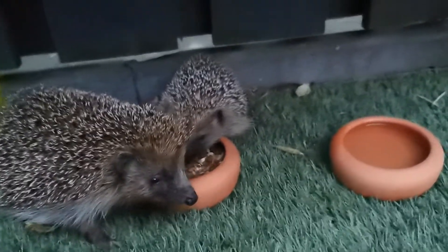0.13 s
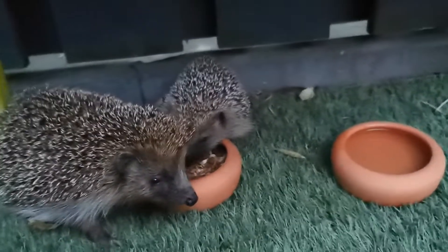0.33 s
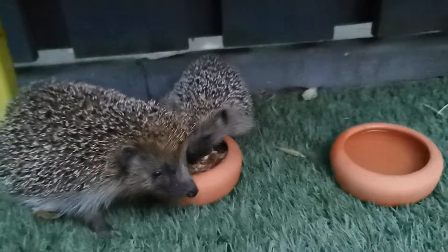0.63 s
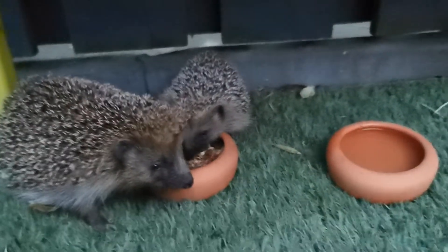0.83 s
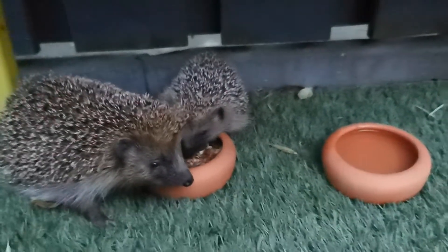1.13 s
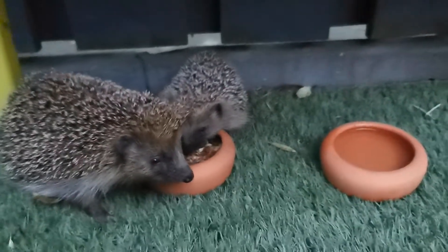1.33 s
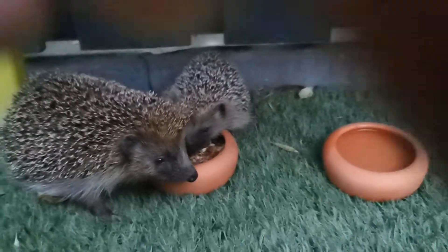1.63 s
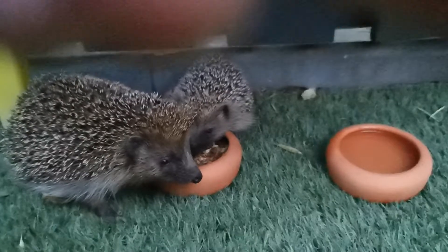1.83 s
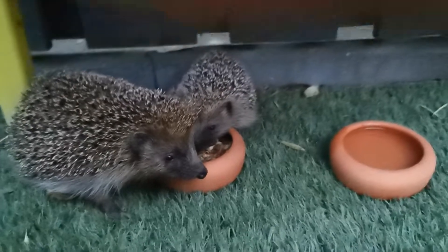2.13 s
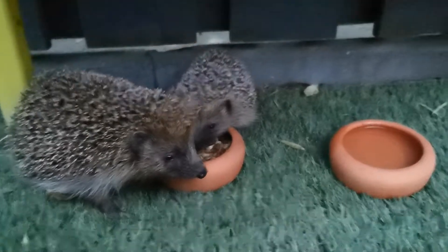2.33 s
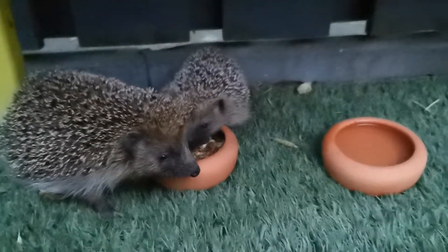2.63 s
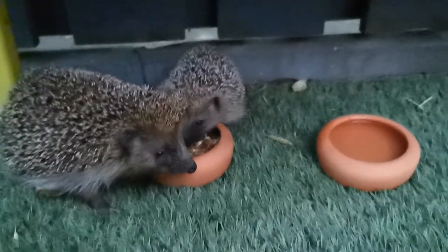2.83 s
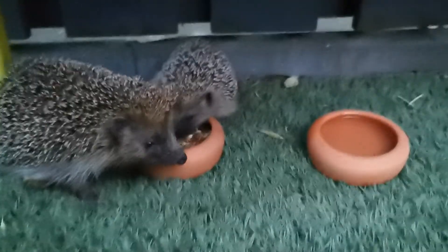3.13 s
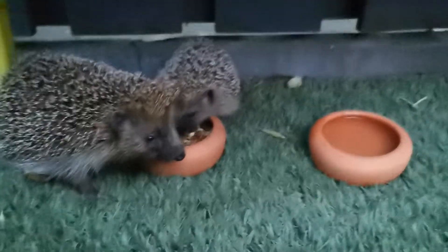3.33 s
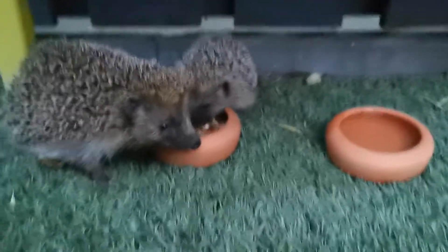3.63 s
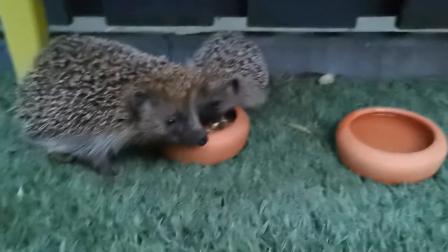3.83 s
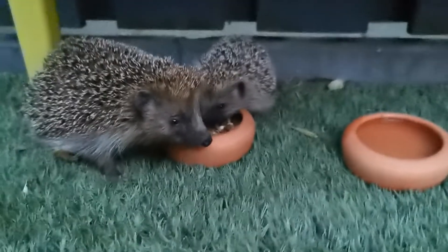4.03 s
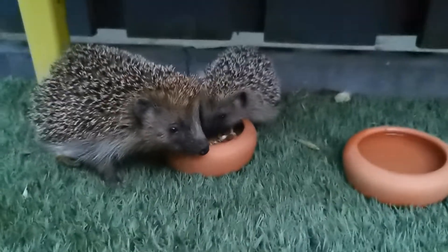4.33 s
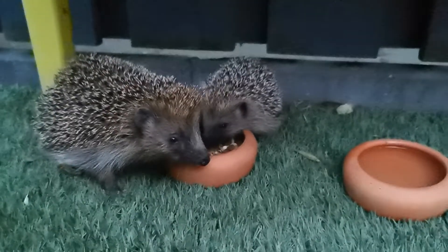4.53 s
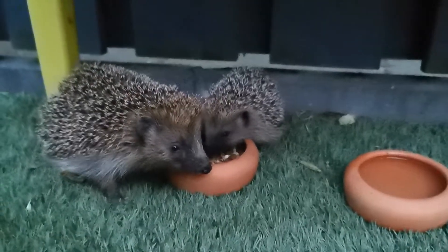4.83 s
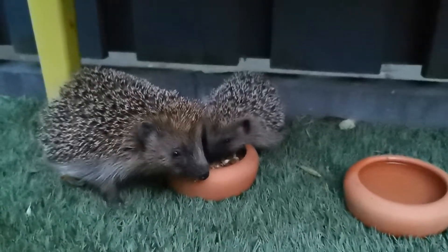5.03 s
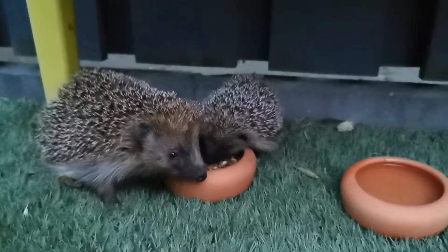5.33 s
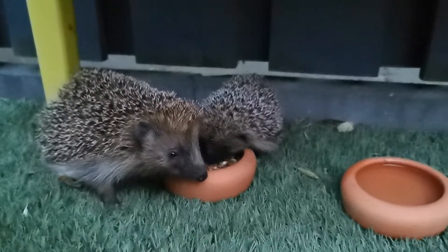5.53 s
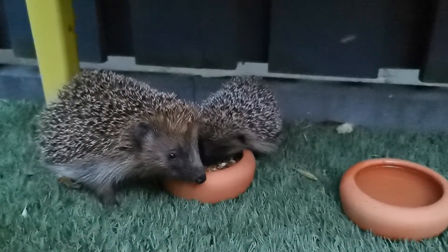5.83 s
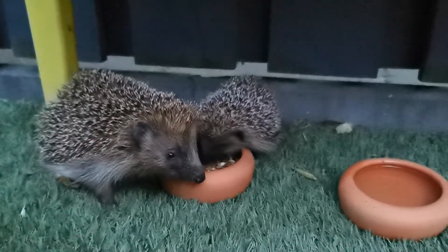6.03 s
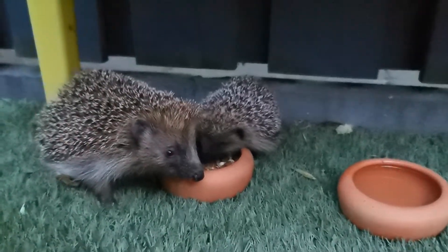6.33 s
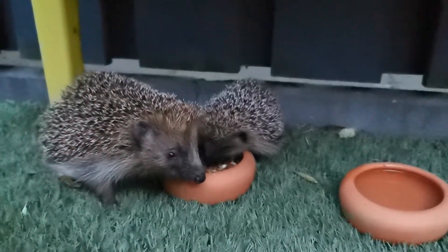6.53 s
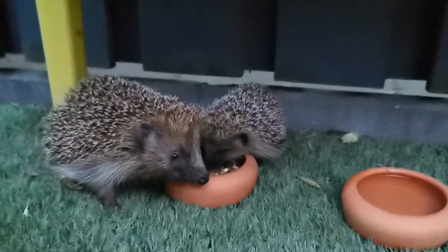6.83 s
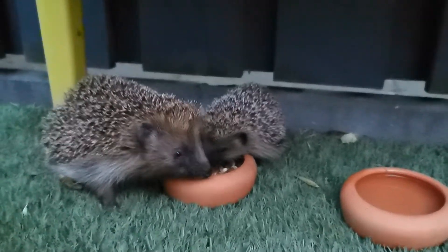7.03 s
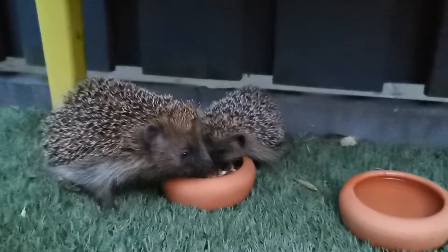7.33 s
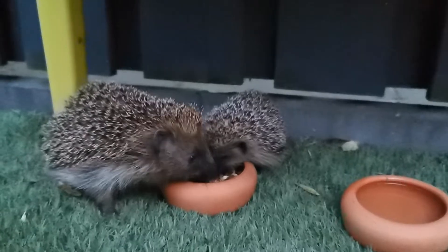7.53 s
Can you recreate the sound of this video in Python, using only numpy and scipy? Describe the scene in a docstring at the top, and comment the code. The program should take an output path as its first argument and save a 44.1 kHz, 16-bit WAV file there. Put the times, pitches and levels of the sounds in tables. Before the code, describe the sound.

A close, quiet garden scene with two hedgehogs eating dry pellets from a clay bowl. A sharp crack opens at 0 s, followed by soft chewing and a faint low swish. From 0.6 to 1.3 s brittle, high snaps come in quick irregular clusters with rustling and tiny splinters, then two more near 1.6 s, one with a dull bowl knock. Faint brushing follows. From 2.3 s a finger rubs the right microphone; between 2.5 and 3 s there are heavy thumps, rumble, crackling slips and a very loud scrape-like pop at 2.7 s. Airy swipes of skin taper until about 4.3 s, with a small case tick at 4.5 s. A faint low hum rises around 4.6 s. Crunching resumes, with strong snaps at 5.2 and 5.5 s, then lighter scattered cracks, rustles and soft low bumps to 7.6 s, over low outdoor murmur and thin hiss.

```python
"""Hedgehogs crunching dry food

Two hedgehogs crack pellets at a clay bowl on a lawn: noise bursts excite ringing snaps, bodies and splinters.
Soft chewing, rustling, swishes and smacks in between are grainy coloured noise; bowl knocks are damped sines. A
finger rubs and slips at the right microphone port of a phone, and the hand bumps the case: shaped noise,
spikes, pressure swings. Behind are a low garden murmur, wavering hums, a swelling low hum that rises in pitch,
and thin hiss."""
import sys
import numpy as np
from scipy import signal
from scipy.fft import rfft, irfft, next_fast_len
from scipy.io import wavfile
from scipy.ndimage import uniform_filter1d

SR = 44100
rng = np.random.default_rng(int(sys.argv[2]) if len(sys.argv) > 2 else 0)


def persist_wave(psi):
    """Save psi, clipped to +-1, as 16-bit WAV."""
    counts = np.round(np.clip(psi, -1, 1) * 32767).astype(np.int16)
    wavfile.write(sys.argv[1], SR, np.atleast_2d(counts).T)


N = 339129
TIME = np.arange(N) / SR

# pellet cracks: start_s, nominal_peak_db, snap_hz, body_re_snap_db, splinters_re_snap_db
CRACK_EVENTS = [(0.0054, -27.5, 5480, -13, -17), (0.57, -47.5, 4970, -9, -23.5),
                (0.606, -37, 5130, -24, -21), (0.615, -35, 5300, -27, -19), (0.624, -37, 5100, -30, -12),
                (0.6491, -31, 5360, -25, -10.5), (0.6739, -29.5, 5130, -16, -16),
                (0.703, -35, 4800, -27, -25), (0.8934, -37, 4870, -8.5, -27.5),
                (0.9305, -27, 5200, -8, -14), (0.954, -32.5, 5470, -11, -9), (0.9819, -24, 4940, -20, -21),
                (1.013, -40, 4660, -5, -13), (1.1557, -43, 4960, -27, -24),
                (1.165, -37.5, 4970, -29, -24.5), (1.2201, -24.5, 5120, -10.5, -11.5),
                (1.227, -38.5, 5430, -6, -15.5), (1.262, -40.5, 4730, -5.5, -5),
                (1.2696, -32, 5400, -5, -8), (1.5892, -32.5, 5080, -13, -14.5),
                (1.6282, -30.5, 5180, -8, -5), (5.0185, -54, 5460, -8, -12), (5.0678, -55.5, 5900, 0, 1),
                (5.189, -27, 5770, -3.5, -3.5), (5.4342, -47, 5800, -7, -9),
                (5.44, -43.5, 5810, -12.5, -13), (5.526, -26, 5350, -4, -11.5),
                (5.971, -37, 5370, -13, -10), (6.1806, -40, 5350, -5.5, -23), (6.2196, -30, 5770, -6.5, -6),
                (6.251, -35.5, 5600, -13, -8), (6.257, -35.5, 5240, -10.5, -8),
                (6.5241, -43.5, 5600, -4, -15), (6.548, -48, 5800, -8, 2.5), (6.558, -41.5, 5150, -11, -17),
                (6.577, -46.5, 5840, -5, -7), (6.778, -40, 5500, -11, -12), (6.841, -46.5, 4970, -2, -2),
                (6.934, -58, 5900, -1, 12.5), (7.242, -40, 5900, -16, -8), (7.2516, -44.5, 6140, -9, -13.5),
                (7.35, -49, 6000, -0.5, -4), (7.526, -53, 5750, 1, 0)]
# finger pressure on the right port, as the level of its rumble: time_s, level_db
FINGER_PRESSURE = [(2.3, -68.5), (2.53, -54), (2.62, -50), (2.74, -49), (2.8, -45.5), (2.92, -50.5),
                   (2.985, -40.5), (3.03, -57.5), (3.22, -58), (3.38, -77), (3.82, -72), (4.39, -71)]
# scraping colour of fingertip and case: freq_hz, gain_db
SCRAPE_COLOUR = [(100, 3.5), (600, -16.5), (2300, 1.5), (3500, -4.5), (6000, -10), (8500, -19), (11000, -2),
                 (13500, -19)]
# finger covers the port up to the first time, then rolls off it until the second
ROLL_START_S, ROLL_END_S = 2.61, 2.95


def from_db(db):
    """Decibels to gain."""
    return 10 ** (np.asarray(db) / 20)


def rms_one(x):
    """Scale to rms 1."""
    return x / np.sqrt(np.mean(x ** 2) + 1e-20)


def in_time(rows):
    """Interpolate each column of a (time, values...) table at every sample."""
    times_s, *columns = np.transpose(rows)
    return [np.interp(TIME, times_s, column) for column in columns]


def during(start_s, end_s):
    """1 inside a stretch of time, with 50 ms fades."""
    corners_s = [start_s - .03, start_s + .02, end_s - .02, end_s + .03]
    return np.interp(TIME, corners_s, [0, 1, 1, 0])


def swell(start_s, length_s, attack_s, release_s):
    """Linear rise, hold to the end of the length, exponential decay."""
    since_s = TIME - start_s
    decay = np.exp(-np.clip((since_s - length_s) / release_s, 0, 30))
    return np.clip(since_s / attack_s, 0, 1) * decay


def together(gains):
    """Unrelated noises add in power."""
    return np.sqrt(sum(gain ** 2 for gain in gains))


def pan(left_re_right_db):
    """Left and right gains with a mean of 1."""
    gains = from_db([[left_re_right_db / 2], [-left_re_right_db / 2]])
    return gains / gains.mean()


def add(out, start_s, sound):
    """Mix a short sound in at its start time."""
    start = max(round(start_s * SR), 0)
    out[:, start:start + sound.shape[-1]] += sound[..., :max(N - start, 0)]


def colour(x, spectrum):
    """Causal minimum-phase filter with the given (Hz, dB) spectrum, built from its cepstrum."""
    size = 2 * next_fast_len(x.shape[-1] // 2 + 512)
    hz, db = np.transpose(spectrum)
    bins_hz = np.fft.rfftfreq(size, 1 / SR)
    log_gain = np.log(from_db(np.interp(np.log(bins_hz + 1), np.log(hz), db)))
    cepstrum = irfft(log_gain)[:size // 2]
    cepstrum[1:] *= 2   # fold onto positive time
    return irfft(rfft(x, size) * np.exp(rfft(cepstrum, size)))[..., :x.shape[-1]]


def resonance(x, hz, width_hz):
    """Two-pole band-pass with peak gain 1."""
    r = np.exp(-np.pi * width_hz / SR)
    zeros = np.array([1, 0, -1]) * (1 - r * r) / 2
    poles = [1, -2 * r * np.cos(2 * np.pi * hz / SR), r * r]
    return signal.lfilter(zeros, poles, x)


def drift(rate_hz):
    """Random knots of spread 1, joined by straight lines."""
    knots = rng.standard_normal(int(N / SR * rate_hz) + 2)
    return np.interp(TIME * rate_hz, np.arange(len(knots)), knots)


def noise(spectrum, alike, grain_db=0., grain_rate_hz=300):
    """Coloured stereo noise of rms 1; alike is the power shared by both sides, grains clump it."""
    shared = np.sqrt(alike) * rng.standard_normal(N)
    white = shared + np.sqrt(1 - alike) * rng.standard_normal((2, N))
    grains = from_db(grain_db * drift(grain_rate_hz))
    grains /= np.sqrt(uniform_filter1d(grains ** 2, size=2200))   # even level over 50 ms
    return rms_one(colour(white * grains, spectrum))


def crunching():
    """Each crack excites a ringing snap, a duller body and a brief spray of splinters."""
    # jaw and pellet, for a 5650 Hz snap: freq_hz, gain_db
    body_colour = [(200, -45), (550, -5.5), (1450, -3), (1950, -1), (2550, 6), (3150, -4), (3600, 1.5),
                   (4050, -4.5), (4700, -1), (8000, -19.5)]
    # splinters: freq_hz, gain_db
    splinter_colour = [(4000, -38), (6800, 13), (7800, 19), (10600, 27), (13000, 23), (15200, 25)]
    # hollow of the bowl, common to all snaps: freq_hz, gain_db
    hollow_colour = [(3900, -12), (4650, 4), (4880, 4), (5080, 6), (5300, 2.5), (5600, 7), (5850, 4.5),
                     (6350, -6.5), (6900, 6), (8000, -7)]
    crest_db = 19.5        # nominal peak above mean level
    snap_pan_db = -2       # snaps lie further right than the other feeding
    right_delay_s = 3.5e-5   # right port is slightly farther away
    out = np.zeros((2, N))
    for start_s, peak_db, hz, body_db, splinter_db in list(CRACK_EVENTS) + crumbs():
        run_s = 0.002 * from_db(0.07 * (peak_db + 45.0))   # harder bites crack for longer
        crack = fracture(run_s, echo_db=4.0, echo_s=0.0017, fence_db=-7.5, fence_s=0.008)
        ringing = resonance(resonance(crack, hz, 900), hz, 1800)
        snap = rms_one(colour(ringing, hollow_colour)) * pan(feeding_side(start_s) + snap_pan_db)
        body_modes = np.array(body_colour) * [hz / 5650, 1]   # a small pellet rings higher all over
        body = rms_one(colour(crack, body_modes)) * from_db(body_db) * pan(-3.3)
        spray = colour(crack * np.exp(-TIME[:crack.shape[1]] / 0.024), splinter_colour)
        splinters = rms_one(spray) * from_db(splinter_db) * pan(-11.0)
        add(out, start_s, from_db(peak_db - crest_db) * (snap + body + splinters))
    left, right = out
    return np.array([left, np.interp(TIME - right_delay_s, TIME, right)])


def crumbs():
    """Three tiny cracks trail each bite at random delays and borrow its colour."""
    delay_scale_s, re_bite_db, top_db = .018, -12.5, -54
    chance = rng.random((len(CRACK_EVENTS), 3, 2))
    rows = []
    for (start_s, peak_db, *colouring), pieces in zip(CRACK_EVENTS, chance):
        for late, weak in pieces:
            delay_s = -delay_scale_s * np.log(1 - late * .95)
            crumb_db = min(peak_db + re_bite_db, top_db) - 6 * weak
            rows.append((start_s + delay_s, crumb_db, *colouring))
    return rows


def fracture(run_s, echo_db, echo_s, fence_db, fence_s):
    """A crack runs in tiny random steps; bowl and fence scatter it, differently to each side."""
    t = TIME[:4096]
    steps = rng.standard_normal(len(t)) * from_db(rng.normal(0, 5, len(t)))
    steps *= np.exp(-(t / run_s) ** 4)
    bowl, fence = rng.standard_normal((2, 2, len(t))) * (1 - np.exp(-t / run_s))
    bowl = from_db(echo_db) * rms_one(bowl * np.exp(-t / echo_s))
    fence = from_db(fence_db) * rms_one(fence * np.exp(-t / fence_s))
    return rms_one(steps) + bowl + fence


def feeding_side(time_s):
    """L-R dB of the feeding: it moves inward as the hand shifts its grip."""
    early_db, late_db = -10, -4.5
    return np.interp(time_s, [FINGER_PRESSURE[0][0], FINGER_PRESSURE[-1][0]], [early_db, late_db])


def knocks():
    """Pellets knock the clay bowl; it rests on grass, so its ring dies within milliseconds."""
    # knocks: start_s, ring_hz, level_db
    bowl_hits = [(1.6299, 1640, -35), (5.191, 1330, -35.5), (5.1916, 2506, -32)]
    ring_decay_s = 0.0012
    out = np.zeros((2, N))
    t = TIME[:1024]
    for start_s, hz, db in bowl_hits:
        ring = np.sin(2 * np.pi * hz * t) * np.exp(-t / ring_decay_s)
        add(out, start_s, from_db(db) * ring * pan(-2))
    return out


def feeding():
    """Soft chewing and grainy rustle of spines, grass and pellets swell with bites and snout pushes."""
    # chewing level, before the munching swing: time_s, level_db
    chewing_level = [(0.02, -58.5), (0.25, -68.5), (0.65, -59.5), (1.1, -66), (1.42, -67.5), (2.2, -69.5),
                     (4.6, -75), (7.66, -75.5)]
    # snout among the pellets: start_s, length_s, rustle_db, chew_re_rustle_db, hiss_re_rustle_db
    rootings = [(0.47, 0.89, -69, -14, -6), (0.862, 0.28, -55, -5, -5.5), (1.136, 0.14, -58.5, -9, -3),
                (2.094, 0.095, -71, 6, 3.5), (2.53, 0.084, -57, -16.5, -13), (4.484, 0.19, -82, -4, 12),
                (4.77, 0.36, -75, -16.5, -5.5), (5.546, 0.27, -71.5, -4, -9), (5.894, 0.058, -69, -7, -3),
                (6.126, 0.21, -67, -6.5, -4), (6.503, 0.064, -64, -6, -11), (7.022, 0.12, -71.5, -21, -0.5),
                (7.192, 0.12, -66, -3, 1.5), (7.32, 0.058, -69, -7, -3), (7.48, 0.16, -79.5, 7, 7)]
    # colours of chewing, rustle and fine hiss: freq_hz, gain_db
    chew_colour = [(450, -0.5), (1450, -4.5), (1700, -0.5), (2200, 8), (3200, -7), (5500, -15), (9000, -52)]
    rustle_colour = [(2000, -22), (3400, -0.5), (4200, 4.5), (5400, 9.5), (6200, -3), (7000, -29),
                     (8500, -26)]
    hiss_colour = [(4000, -25), (6500, -2), (8000, -14.5), (10900, -9), (13200, -13), (16000, -22)]
    root_attack_s, root_release_s = 0.03, 0.025
    munch_spread_db, munch_rate_hz = 3.5, 14
    # constant stirring: level at the loudest chewing, share of the chewing's level curve followed
    stir_db, stir_follows, still_hiss_db = -66.5, 0.69, -74.5
    # grinding, re the crack's peak
    grind_chew_db, grind_rustle_db, grind_hiss_db = -39, -48, -39

    chew_db, = in_time(chewing_level)
    grind = grinding()
    munch_db = munch_spread_db * drift(munch_rate_hz)
    stir = from_db(stir_db + stir_follows * (chew_db - chew_db.max()) + munch_db)
    chew_gains = [from_db(chew_db + munch_db), grind * from_db(grind_chew_db)]
    rustle_gains = [stir, grind * from_db(grind_rustle_db)]
    hiss_gains = [from_db(still_hiss_db), grind * from_db(grind_hiss_db)]
    for start_s, length_s, rustle_db, chew_re_db, hiss_re_db in rootings:
        push = from_db(rustle_db) * swell(start_s, length_s, root_attack_s, root_release_s)
        chew_gains.append(push * from_db(chew_re_db))
        rustle_gains.append(push)
        hiss_gains.append(push * from_db(hiss_re_db))

    chew = nook(noise(chew_colour, alike=0.031, grain_db=2.0, grain_rate_hz=110))
    chew = together(chew_gains) * chew
    rustle = together(rustle_gains) * noise(rustle_colour, alike=0.099, grain_db=2.5, grain_rate_hz=220)
    hiss = together(hiss_gains) * noise(hiss_colour, alike=0.044, grain_db=3.0, grain_rate_hz=160)
    left_db = feeding_side(TIME)
    side = from_db([left_db / 2, -left_db / 2])
    return (chew + rustle) * side / side.mean(0) + hiss * pan(-9.0)


def grinding():
    """Grinding around each crack: a brief hump, strongest just after it, in step with its peak."""
    spread_s = 0.018
    power = np.zeros((1, N))
    hump = np.hanning(int(4 * spread_s * SR)) ** 2
    for start_s, peak_db, *_ in CRACK_EVENTS:
        skipped = max(round((spread_s - start_s) * SR), 0)   # part before time zero
        add(power, start_s - spread_s, from_db(2 * peak_db) * hump[skipped:])
    return np.sqrt(power[0])


def nook(x):
    """Bowl and fence corner add narrow rings, each swelling and fading by itself; rms 1."""
    # rings: freq_hz, width_hz, mean_gain_db
    ring_modes = [(726, 96, -6), (1435, 93, 4), (2326, 42, -2), (2657, 44, 2.5), (3010, 86, 0),
                  (5330, 260, -8), (5740, 160, -3)]
    waver_db, waver_rate_hz = 4, 16
    ringing = 0
    for hz, width_hz, db in ring_modes:
        ringing = ringing + from_db(db + waver_db * drift(waver_rate_hz)) * resonance(x, hz, width_hz)
    return rms_one(x + ringing)


def swishes():
    """Bodies brush the grass and mouths smack softly at random: swells of narrow noise."""
    # body swishes: middle_s, half_length_s, centre_hz, level_db
    body_swishes = [(0.202, 0.091, 360, -61.5), (1.814, 0.027, 4800, -63), (1.892, 0.045, 4760, -61),
                    (3.831, 0.088, 338, -58.5), (5.433, 0.076, 320, -61), (5.625, 0.07, 2900, -69),
                    (7.278, 0.17, 358, -58.5)]
    # smack length and gain are each scaled by 0.5 to 1.5
    smacks_per_s, smack_half_s, smack_db = 13, 0.016, -77
    low_hz, high_hz = 606, 6200
    out = np.zeros((2, N))
    for middle_s, half_s, hz, db in body_swishes:
        add(out, middle_s - half_s, from_db(db) * brush(half_s, hz) * pan(-7.0))
    for when, pitch, size in rng.random((int(smacks_per_s * N / SR), 3)):
        hz = low_hz * (high_hz / low_hz) ** pitch
        scale = .5 + size
        smack = scale * brush(smack_half_s * scale, hz)
        add(out, when * N / SR, from_db(smack_db) * smack * pan(-11))
    return out


def brush(half_s, hz):
    """A brief, grainy swell of narrow friction noise."""
    hump = np.hanning(int(2 * half_s * SR))
    grain_db = np.repeat(rng.normal(0, 3, len(hump) // 256 + 1), 256)[:len(hump)]
    grains = rng.standard_normal(len(hump)) * from_db(grain_db)
    narrow = resonance(grains, hz, 0.087 * hz)
    return rms_one(resonance(narrow, hz, 2.9 * hz)) * hump


def finger_rub():
    """Skin drags on the right port: rumble and crackle under pressure, smooth hiss in light glides."""
    # glides: start_s, length_s, hiss_db, friction_re_hiss_db, sizzle_re_hiss_db
    glides = [(0.16, 0.048, -73, 9, -17), (1.765, 0.41, -74, 1, -20), (2.322, 0.087, -54.5, -6, -6.5),
              (2.532, 0.084, -65, 7, -20), (2.619, 0.176, -57, 1, 0.5), (2.917, 0.27, -59, -28, 1),
              (3.153, 0.061, -52.5, -21, 1), (3.28, 0.11, -61, -19, 0), (3.412, 0.12, -58, -9.5, -4),
              (3.53, 0.24, -63, -7.5, -14), (3.695, 0.079, -52.5, -23, -15),
              (3.749, 0.07, -56.5, -11, -0.5), (3.882, 0.062, -51, -3, 0), (3.914, 0.089, -65, 13, 10.5),
              (4.075, 0.076, -64.5, 8, 5.5), (4.301, 0.031, -58.5, -5, -5.5)]
    # fingertip scrapes: start_s, length_s, level_db
    scrapes = [(2.719, 0.02, -37)]
    # colours of rumble, friction, skin hiss and fine sizzle: freq_hz, gain_db
    rumble_colour = [(25, 5.5), (110, 0), (200, -4), (330, -5), (600, -9), (1200, -20), (3000, -51)]
    friction_colour = [(300, -24), (700, 2), (1300, 1), (2200, 7.5), (3200, 1), (5000, -25), (10000, -39)]
    skin_colour = [(2000, -13), (3500, 2), (5200, 11.5), (6500, 7.5), (8200, -8.5), (11000, -6.5)]
    sizzle_colour = [(6500, 1.4), (10800, 6), (13000, 6.4), (15600, 0.5)]
    glide_attack_s, glide_release_s, glide_rumble_re_hiss_db = 0.037, 0.029, -11.5
    # under pressure, re the rumble
    press_friction_db, press_hiss_db, press_sizzle_db = -9, -13.5, -21
    catch_spread_db, catch_rate_hz = 3, 82   # skin catches and lets go
    stuck_from_s, stuck_to_s, stuck_db = 2.815, 2.945, -4   # skin sticks: rubbing dips
    sizzle_grain = 1.5   # graininess re the friction's: sparse crackles under pressure

    pressure_db, = in_time(FINGER_PRESSURE)
    pressure = from_db(pressure_db) * during(FINGER_PRESSURE[0][0], FINGER_PRESSURE[-1][0])
    grain_db = np.interp(pressure_db, [-57, -49], [1.5, 6])
    rumble_gains = [pressure]
    friction_gains = [pressure * from_db(press_friction_db)]
    hiss_gains = [pressure * from_db(press_hiss_db)]
    sizzle_gains = [pressure * from_db(press_sizzle_db)]
    for start_s, length_s, hiss_db, friction_re_db, sizzle_re_db in glides:
        glide = from_db(hiss_db) * swell(start_s, length_s, glide_attack_s, glide_release_s)
        rumble_gains.append(glide * from_db(glide_rumble_re_hiss_db))
        friction_gains.append(glide * from_db(friction_re_db))
        hiss_gains.append(glide)
        sizzle_gains.append(glide * from_db(sizzle_re_db))

    rumble = noise(rumble_colour, alike=0.56, grain_db=2.5, grain_rate_hz=460) * pan(-53)
    rumble *= together(rumble_gains)
    friction = noise(friction_colour, alike=0.029, grain_db=grain_db, grain_rate_hz=500) * pan(-22.5)
    friction *= together(friction_gains)
    friction *= from_db(catch_spread_db * during(ROLL_START_S, ROLL_END_S) * drift(catch_rate_hz))
    hiss = noise(skin_colour, alike=0.44, grain_db=2.5, grain_rate_hz=430) * pan(-19.5)
    hiss *= together(hiss_gains)
    sizzle = noise(sizzle_colour, alike=0.14, grain_db=sizzle_grain * grain_db, grain_rate_hz=1300)
    sizzle *= together(sizzle_gains) * pan(-29.5)
    out = rumble + friction + shaded(hiss + sizzle)
    out *= from_db(stuck_db * during(stuck_from_s, stuck_to_s))

    grit = noise(SCRAPE_COLOUR, alike=0.06, grain_db=4.0, grain_rate_hz=1400) * pan(-38)
    for start_s, length_s, db in scrapes:
        out += from_db(db) * grit * np.exp(-(2 * (TIME - start_s) / length_s - 1) ** 4)
    return out


def shaded(x):
    """A finger close over the port dulls the highest hiss until it has rolled off."""
    share = np.interp(TIME, [ROLL_START_S, ROLL_END_S], [0.95, 0])
    dull = signal.sosfilt(signal.butter(10, 11500, fs=SR, output="sos"), x)
    return np.sqrt(share) * dull + np.sqrt(1 - share) * x


def finger_slips():
    """Skin slips: lopsided pressure spikes with brief chatter; soft slips rise more slowly."""
    # slips: start_s, energy_db, softness_hz (low-pass poles lie at 1.5 and 4.3 times this)
    slip_events = [(2.4851, -24.5, 1030), (2.5443, -17, 198), (2.602, -18, 605), (2.661, -28, 6000),
                   (2.696, -24, 6000), (2.7161, 2, 400), (2.734, -13, 1114), (2.759, -18.5, 1310),
                   (2.8008, -14.5, 300), (2.804, -14, 600), (2.815, -5, 2820), (2.829, -21, 700),
                   (2.8425, -10, 1060), (2.853, -15.5, 296), (2.8786, -15.5, 1520), (2.8802, -16, 300),
                   (2.898, -6.5, 2750), (2.9526, -12.5, 350), (2.967, -21.5, 353), (3.075, -33, 14000),
                   (3.0977, -22, 4570), (3.52, -32.5, 14000), (3.5821, -30.5, 2520)]
    port_colour = [(600, 4.5), (2200, 9.0), (3500, 3.5), (5500, 6.5),
                   (8200, -2.0), (11000, 14.5), (15000, -5)]   # freq_hz, gain_db
    rumble_cut = signal.butter(1, 130, "high", fs=SR, output="sos")
    out = np.zeros((2, N))
    t = TIME[:1024]
    for start_s, energy_db, softness_hz in slip_events:
        spike = from_db(-27) * rng.standard_normal(len(t)) * np.exp(-t / 0.001)   # chatter
        spike[0] = 1
        for ratio in (1.5, 4.3):
            pole = np.exp(-2 * np.pi * ratio * softness_hz / SR)
            spike = signal.lfilter([1], [1, -pole], spike)
        spike = colour(signal.sosfilt(rumble_cut, spike), port_colour)
        spike = spike / np.linalg.norm(spike) * rng.choice([-1, 1])
        add(out, start_s, spike * from_db(energy_db) * pan(-42.5))
    return out


def bumps():
    """A soft knock on the case is one slow swing of pressure, with a little scuff of skin."""
    # finger and hand bumps: middle_s, swing_hz, left_db, right_db
    bump_events = [(2.548, 108.5, -48, -19), (2.611, 140, -45, -13), (2.6115, 334, -58, -24),
                   (2.983, 99.5, -94.0, -32.5), (4.468, 180, -45, -40.5), (5.122, 97, -41, -57),
                   (6.103, 122, -42.5, -51), (6.343, 139, -42, -52), (6.4, 121, -42, -59),
                   (6.453, 141, -41.5, -54), (7.199, 97.5, -39.5, -52), (7.302, 106, -38, -46),
                   (7.343, 70, -43, -47), (7.353, 169, -38, -48)]
    out = np.zeros((2, N))
    t = TIME[:2048] - TIME[1024]
    for middle_s, hz, left_db, right_db in bump_events:
        phase = 2 * np.pi * hz * t
        scuff = from_db(-28.5) * rms_one(resonance(rng.standard_normal(len(t)), 450, 510))
        swing = (phase + scuff) * np.exp((1 - phase ** 2) / 2)
        add(out, middle_s + t[0], from_db([[left_db], [right_db]]) * swing)
    return out


def case_tick():
    """The case gives a dry tick by the right port as the grip shifts: a coloured fracture burst."""
    start_s, level_db = 4.4645, -60
    out = np.zeros((2, N))
    crack = fracture(0.0044, echo_db=-7, echo_s=0.0018, fence_db=-10, fence_s=0.014)
    tick = rms_one(colour(crack, SCRAPE_COLOUR[1:]) + resonance(crack, 3900, 2000))
    add(out, start_s, from_db(level_db) * tick * pan(-22))
    return out


def garden():
    """Low outdoor murmur with faint hums and a swelling low hum in it, under a thin hiss."""
    # murmur and thin outdoor hiss: freq_hz, gain_db
    murmur_colour = [(20, -13), (36, -0.5), (54, -4.5), (100, 1), (175, -7), (300, -12), (400, -12),
                     (470, -22), (700, -19), (1300, -35.5), (2800, -43)]
    air_colour = [(700, 2), (1450, -2.5), (1800, -15), (2400, -8), (3400, 1), (5600, -8.5), (8000, -9),
                  (15500, -13)]
    # far-off hums: pitch_hz, width_hz, mean_level_db
    hums = [(56.5, 3.1, -68), (360.7, 16.05, -78), (396.7, 9, -79)]
    # low hum swells and rises in pitch: time_s, pitch_hz, level_db
    hum_swell = [(3.8, 87.5, -75.5), (4.58, 91.7, -63.5), (5.2, 98.5, -67), (5.8, 99.3, -76)]
    murmur_db, air_db = -63, -73.0
    murmur = from_db(murmur_db) * noise(murmur_colour, alike=0.79) * pan(1.0)
    drones = 0
    for hz, width_hz, db in hums:
        drones = drones + from_db(db + 4.04 * drift(5.5)) * tone(hz, width_hz / 2)
    swell_hz, swell_db = in_time(hum_swell)
    swelling_hum = from_db(swell_db) * tone(swell_hz, wander_hz=1.15)
    air = nook(noise(air_colour, alike=0.0092, grain_db=10.0, grain_rate_hz=34))
    return murmur + (drones + swelling_hum) * pan(2.7) + from_db(air_db) * air * pan(2.4)


def tone(hz, wander_hz):
    """A sine of rms 1 whose pitch wanders at random."""
    pitch_hz = hz + wander_hz * drift(14)
    return np.sqrt(2) * np.sin(2 * np.pi * np.cumsum(pitch_hz) / SR)


def scene():
    """The animals, the hand on the phone and the garden."""
    # treble lift of the animals at the left port: freq_hz, gain_db
    left_port_colour = [(6500, 0), (9000, 9), (11500, -1.5)]
    left, right = crunching() + knocks() + feeding() + swishes()
    animals = np.array([colour(left, left_port_colour), right])
    hand = finger_rub() + finger_slips() + bumps() + case_tick()
    return animals + hand + garden()


def record(dry):
    """Cut the top steeply with an elliptic low-pass."""
    cutoff_hz = 15850
    return signal.sosfilt(signal.ellip(10, .2, 80, cutoff_hz, fs=SR, output="sos"), dry)


dry = scene()
out = record(dry)
persist_wave(out)
```